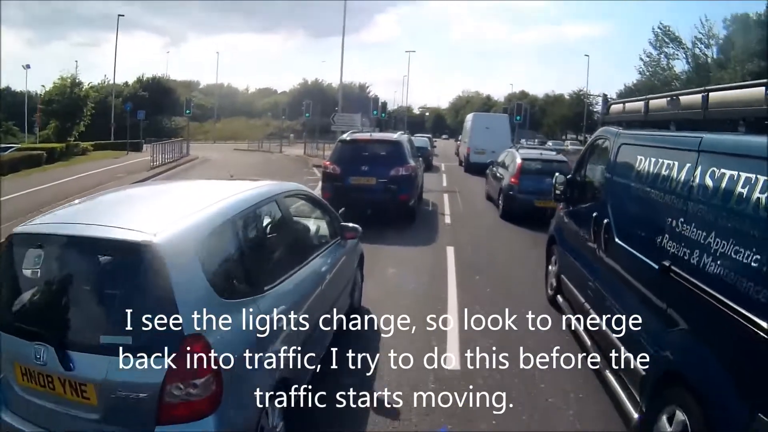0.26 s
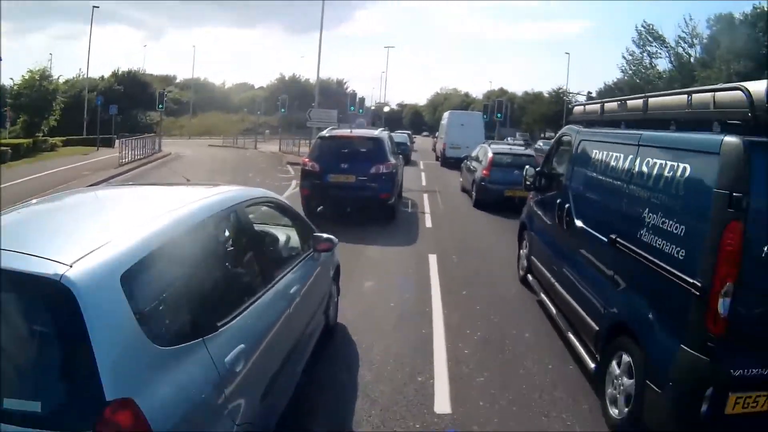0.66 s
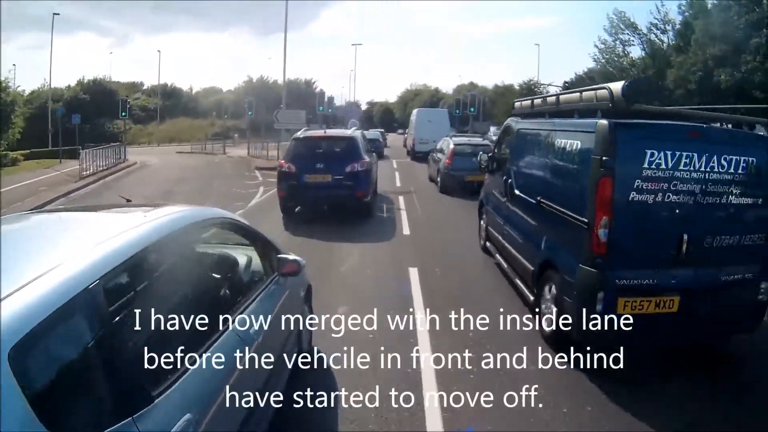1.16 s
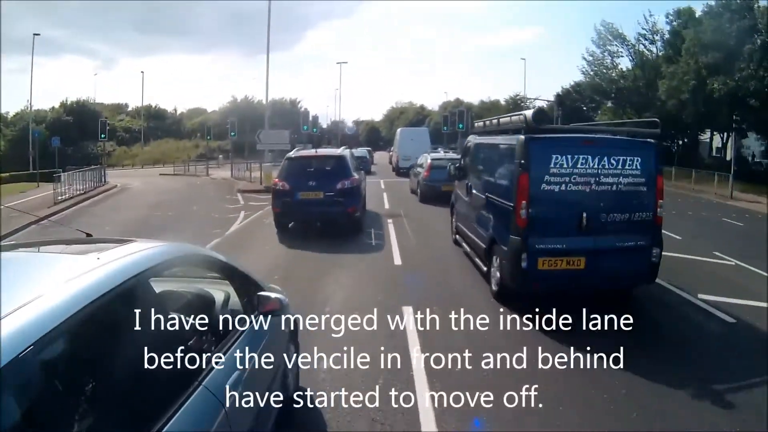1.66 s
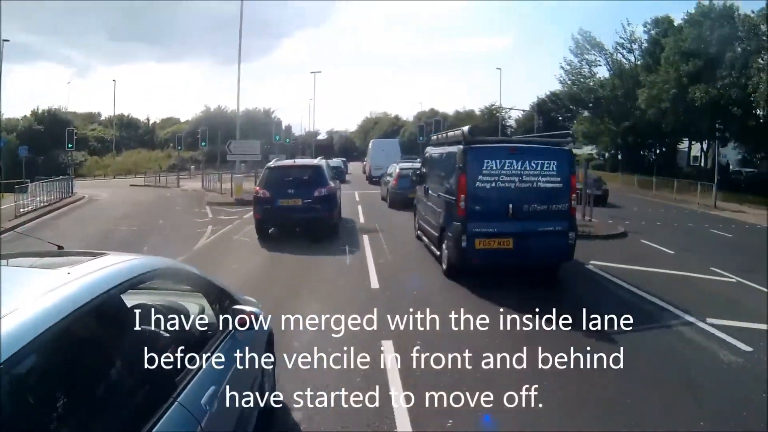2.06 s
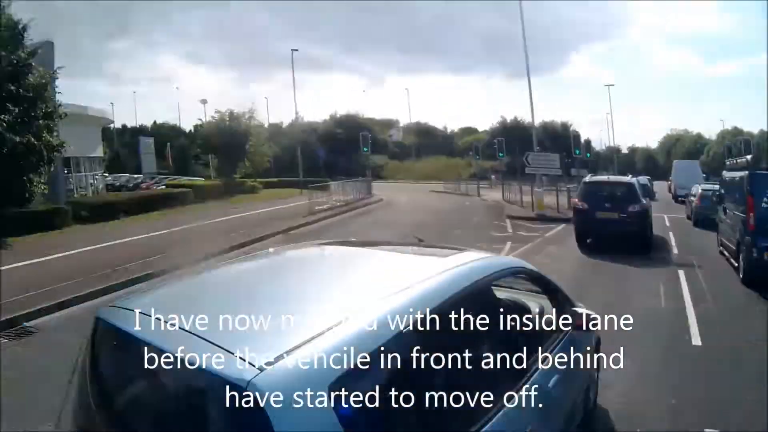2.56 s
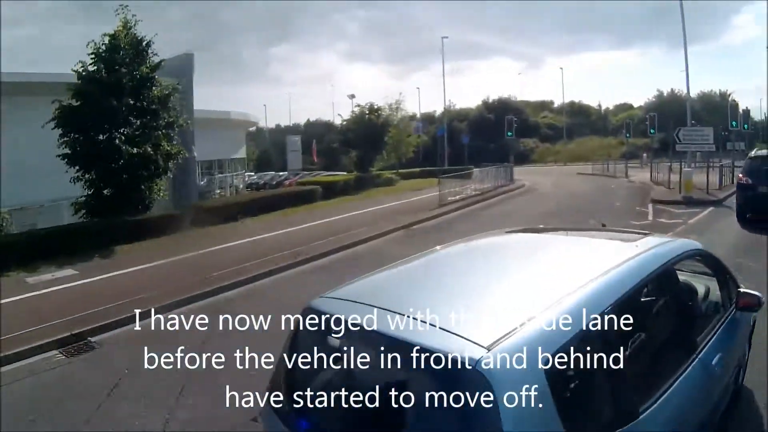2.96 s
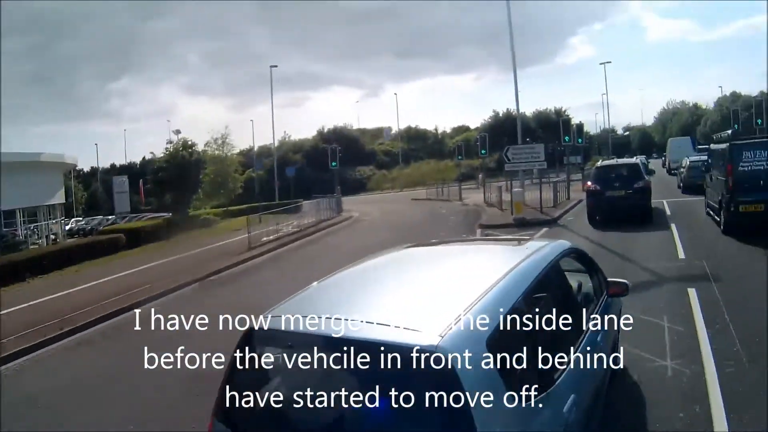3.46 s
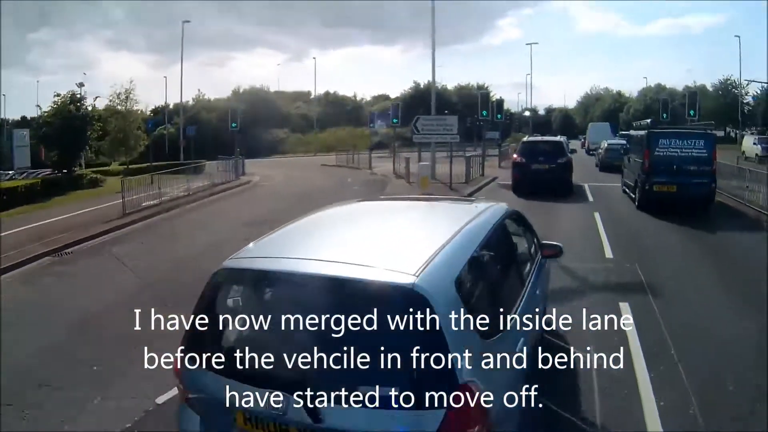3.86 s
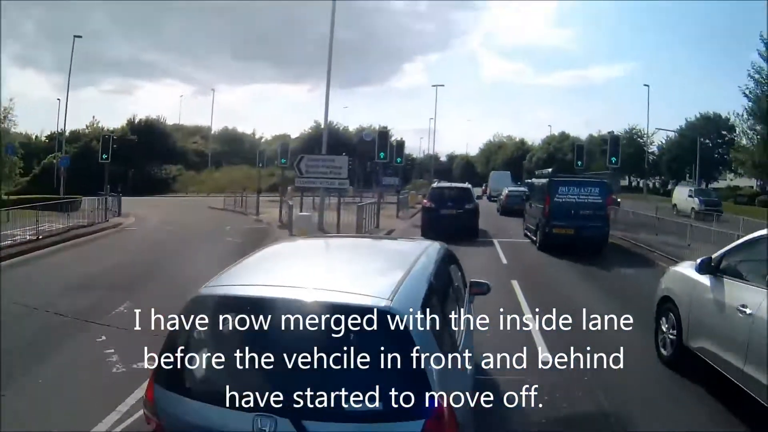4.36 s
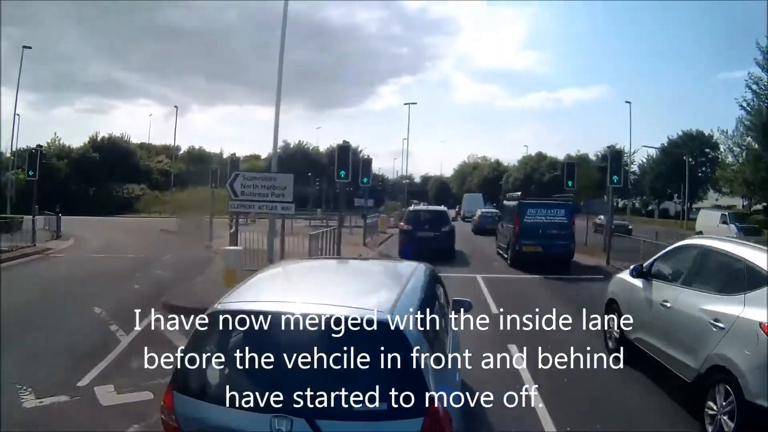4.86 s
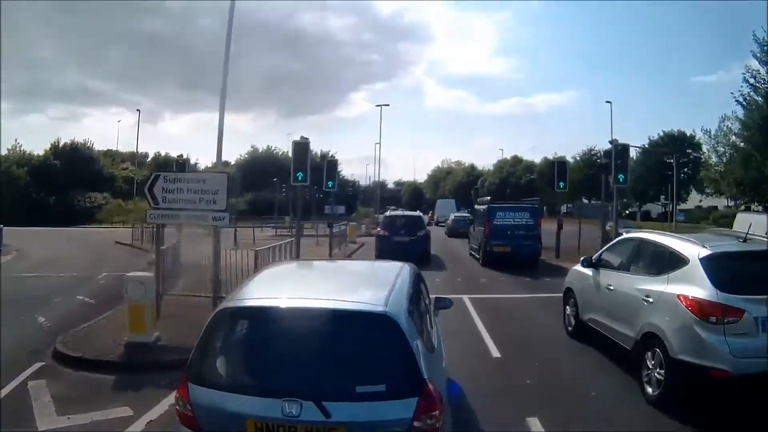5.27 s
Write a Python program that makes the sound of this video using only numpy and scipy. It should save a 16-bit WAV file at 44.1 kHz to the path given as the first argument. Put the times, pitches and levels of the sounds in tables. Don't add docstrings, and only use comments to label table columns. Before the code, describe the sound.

A two-tone car horn gives one steady blast late on, over low traffic rumble, pulling-away engines and wind buffeting a rider's microphone.

```python
import sys
import numpy as np
from scipy import signal
from scipy.io import wavfile
from scipy.ndimage import uniform_filter1d

SR = 44100
rng = np.random.default_rng(int(sys.argv[2]) if len(sys.argv) > 2 else 0)


def log_audio(samples):
    frames = np.atleast_2d(samples).T
    limited = np.clip(frames, -1, 1)
    pcm = np.round(limited * 32767).astype(np.int16)
    wavfile.write(sys.argv[1], SR, pcm)


def invert_db(x):
    u = np.asarray(x, float) / 20
    return 10 ** u


N = 243431

# (frequency [Hz], level [dB per Hz])
ROAD_COLOUR = [(8.8, -42), (15, -23), (48, -2.5), (71, -9), (123, -8.5), (336, -16), (489, -18.5),
               (808, -18), (1300, -25.5), (1550, -24.5), (2200, -31.5), (2690, -32), (6000, -55),
               (7800, -95), (13200, -120)]
# (rumble [dB/s], roar [dB/s], hiss [dB/s])
QUEUE_GROWTH = (0.61, 0.55, 0.3)
# (time [s], level [dB], length [s], centre [Hz])
TYRE_SURGES = [(0.122, 1.5, 0.33, 150), (1.555, 2, 0.62, 2080), (2.2, 1.5, 0.94, 1670),
               (2.15, 3, 0.22, 199), (2.74, 3, 0.47, 840), (2.903, 1.5, 0.19, 2500), (3.3, 2, 0.2, 200),
               (3.57, 4.5, .12, 700), (3.8, 3.5, 0.37, 1274), (3.98, 4, 0.26, 200), (4.199, 3, 0.12, 705),
               (4.598, 4, 0.1, 180), (4.84, 2, .1, 150), (5.292, 7.5, 0.053, 149.9), (5.379, 2, .12, 2002)]
SURGE_OCTAVES, SURGE_LEAD = 1, 0.69

# (time [s], firing rate [Hz], level [dB])
NEAR_ENGINE = [(0.7, 23.32, -34), (1.2, 26.28, -37), (1.4, 31.63, -31), (1.53, 37.33, -29),
               (1.81, 47.3, -32), (1.99, 49.05, -27.5), (2.36, 46.5, -29.5), (3.02, 45.43, -27.5),
               (3.5, 42.36, -31.5), (4.0, 40.46, -24.5), (4.09, 41.9, -23.5), (4.4, 43.63, -38),
               (4.78, 46.3, -23.5), (4.9, 48.2, -38), (5.06, 48.76, -27), (5.7, 54.7, -30.5)]
AHEAD_ENGINE = [(0.0, 40.4, -42), (0.54, 44.27, -30), (1.0, 45.7, -34.5), (1.3, 45.6, -28),
                (1.41, 48.55, -31), (1.77, 60.1, -24.5), (2.1, 68.7, -28.5), (2.18, 70.16, -22),
                (2.51, 79.7, -24.5), (2.8, 86.96, -23.5), (3.2, 88.46, -25.5), (3.45, 85.3, -28.5),
                (3.6, 82.46, -33), (3.68, 83.1, -21.5), (3.95, 75.6, -23.5), (4.2, 75.5, -34)]
FAR_ENGINE = [(0.6, 53.64, -35), (1.02, 61.26, -31.5), (1.35, 74.4, -32), (1.49, 78.9, -27),
              (1.8, 88.4, -35.5), (2.16, 92.4, -33), (2.32, 92.6, -39), (2.45, 86.2, -29), (2.7, 86, -32)]
BESIDE_ENGINE = [(2.6, 62.7, -31), (2.95, 69.06, -31), (3.054, 72.5, -24), (3.2, 75, -33),
                 (3.42, 74.5, -27)]
# (time [s], firing rate [Hz], level [dB])
IDLE_ENGINE = [(0, 98.6, -52), (.2, 97.2, -38), (.5, 101.2, -29), (.75, 100.7, -39), (.9, 100, -46)]
LATE_ENGINE = [(2.8, 123.3, -37), (3, 121.5, -38), (3.2, 118.6, -31.5), (3.4, 114.2, -35.5),
               (3.6, 111.5, -48)]
# (time [s], firing rate [Hz], level [dB], drone level [dB])
VAN_ENGINE = [(0.0, 66.3, -21, -43), (0.2, 64.95, -26.5, -38), (0.382, 70.03, -27, -41.5),
              (0.842, 88.1, -36.5, -34.5), (1.1, 93, -42, -44)]

# (time [s], level [dB], length [s])
WIND_GUSTS = [(1.18, -39, .12), (1.516, -29, .07), (2.72, -31, .07), (3.079, -34, 0.11), (3.499, -34, .07),
              (3.8, -34, .15), (4.085, -27, 0.065), (4.36, -30, .07), (4.81, -25.5, .07), (5.281, -30, .1),
              (5.52, -31, 0.099)]
CALM_DB = -49

# (time [s], level [dB], swing rate [Hz])
FRAME_BUMPS = [
    (4.06, -20, 55),
    (4.088, -17, 60),
    (5.294, -12, 130),
    (5.314, -13, 60),
]

# (time [s], level [dB])
LOW_SWING = [(4.31, -19), (4.59, -18.5), (4.66, -20.5), (4.79, -16), (4.85, -22), (4.95, -22.5),
             (5.02, -20.5), (5.17, -20.5), (5.22, -18.5)]
HIGH_SWING = [(4.31, -21), (4.38, -26.5), (4.46, -20.5), (4.59, -28), (4.72, -21), (4.8, -23.5),
              (4.87, -21.5), (5.15, -17.5), (5.22, -20)]
# (time [s], pitch [Hz])
LOW_PITCH = [(4.31, 368.5), (4.5, 367.5), (4.72, 368.45), (4.96, 366.8), (5.22, 367.25)]
# (multiple [-], level at the start [dB], level
# at the end [dB])
LOW_ECHOING = [(6, -37.5, -48), (7, -20, -24), (8, -19.5, -18.5), (9, -41.5, -44.5)]
HIGH_ECHOING = [(4, -42.5, -51), (5, -49.5, -47.5), (6, -34, -33), (7, -40, -31)]
# (multiple [-], level at the start [dB], level at the end
# [dB])
LOW_WAVERING = [(4, -50, -45), (5, -37, -57), (10, -57, -59), (11, -55, -48), (12, -58, -58), (13, -56, -56),
                (14, -51, -54), (15, -59, -59), (16, -59, -59)]
HIGH_WAVERING = [(2, -45, -37), (3, -51, -52), (8, -45, -42), (9, -54, -56)]
# (multiple of low [-], steps of the beat [-], level [dB])
BEAT_TONES = [(6, 1, -51), (7, -1, -40), (7, 1, -34), (7, 2, -45), (8, -1, -42), (8, 1, -38), (8, 2, -47),
              (11, 1, -59), (11, 5, -59), (9, 1, -54)]
# (frequency [Hz], level [dB], decay by 60 dB [s])
DISC_RINGS = [(2600, -46, .4), (2645, -38.5, .3), (3025, -38.5, .3), (3079, -46, .25), (2890, -46, .25),
              (3600, -52, .012), (4080, -52, .01)]
MIRROR_PATHS = [(0.138, 7.961, -0.256, -0.145), (1.109, 0.615, 0.032, -0.005), (0.43, 4.538, -0.719, 0.381),
                (0.429, 1.759, 0.447, -0.558), (0.248, 4.971, -1.116, 0.647),
                (0.202, 6.964, -0.019, -0.436)]
PRESS_S, STRIKE_S, RELEASE_S = 4.28, 4.2963, 5.236
LOW_HZ, HIGH_TO_LOW = 367.7, 1.1196
SOUND_M_PER_S = 343


def evened(x):
    return x / np.sqrt(np.mean(x ** 2) + 1e-20)


def curves(rows):
    s, *columns = np.transpose(rows)
    return [np.interp(np.arange(N) / SR, s, column) for column in columns]


def drift(hz):
    step = np.arange(N) * 2 * hz / SR
    points = int(step[-1]) + 2
    return np.interp(step, np.arange(points), rng.standard_normal(points))


def band(x, low_hz, high_hz):
    return signal.sosfilt(signal.butter(2, [low_hz, high_hz], "band", fs=SR, output="sos"), x)


def tone(db, turns):
    return np.sqrt(2) * invert_db(db) * np.sin(turns + 2 * np.pi * rng.random())


def traffic():
    frames, hz = N // 256 + 5, np.fft.rfftfreq(1024, 1 / SR)
    a, b, patches = rng.standard_normal((frames, 513, 3)).T
    patches = evened(uniform_filter1d(uniform_filter1d(patches, 8, 0), 24, 1))
    t = (np.arange(frames) - 2) * 256 / SR
    swell = np.outer(QUEUE_GROWTH, t - t.mean())
    surges = 0
    for s, db, length, centre_hz in TYRE_SURGES:
        in_pitch = np.exp(-(np.log2((hz + 1) / centre_hz) / SURGE_OCTAVES) ** 2)
        in_time = np.exp(-((t - s) / np.where(t < s, SURGE_LEAD * length, length)) ** 2)
        surges = surges + db * np.outer(in_pitch, in_time)
    place = np.interp(np.log(hz + 1), np.log([200, 800, 2000]), [0, 1, 2])
    share = np.clip(1 - abs(place[:, None] - np.arange(3)), 0, 1)
    road_hz, road_db = np.transpose(ROAD_COLOUR)
    colour = np.interp(np.log(hz + 1), np.log(road_hz + 1), road_db, right=-100)
    level_db = colour[:, None] + share @ swell + surges + 0.79 * patches
    roar = signal.istft((a + 1j * b) * invert_db(level_db), nperseg=1024, noverlap=768)[1][:N]
    return invert_db(-26.5) * evened(roar)


def engine(rows, orders, rough):
    hz, db = curves(rows)
    t = np.arange(N) / SR
    inside = np.minimum(t - rows[0][0] + 0.047, rows[-1][0] + 0.034 - t)
    heard = np.clip(inside / 0.16, 0, 1)
    turns = 2 * np.pi * np.cumsum(hz * (1 + .004 * drift(6))) / SR
    exhaust = sum(tone(order_db + 2.1 * drift(4) * (k != 1), k * turns) for k, order_db in orders)
    return invert_db(db) * heard * exhaust * (1 + rough * drift(14))


def engines():
    near = engine(NEAR_ENGINE, [(1, 0), (2, -20), (3, -8.5), (4, -20)], rough=.12)
    ahead = engine(AHEAD_ENGINE, [(1, 0), (2, -26)], rough=.1)
    _, firing_db, drone_db = curves(VAN_ENGINE)
    van = engine([row[:3] for row in VAN_ENGINE], [(1, 0), (2, drone_db - firing_db)], rough=0.29)
    far = engine(FAR_ENGINE, [(1, 0), (2, -18)], rough=.12)
    faint = sum(engine(rows, [(0.98, 0)], rough=0.068) for rows in (BESIDE_ENGINE, IDLE_ENGINE, LATE_ENGINE))
    return near + ahead + van + far + faint


def wind():
    t = np.arange(N) / SR
    gusts = sum(invert_db(db) * np.exp(-((t - s) / length) ** 2) for s, db, length in WIND_GUSTS)
    pressure = evened(band(band(rng.standard_normal(N), 18.5, 55), 11.5, 60))
    return (invert_db(CALM_DB) + gusts) * invert_db(-3.0) * pressure


def bumps():
    t, out = np.arange(N) / SR, np.zeros(N)
    for s, db, hz in FRAME_BUMPS:
        out += invert_db(db) * np.exp(-((t - s) * hz / 0.27) ** 2) * np.sin(2 * np.pi * hz * (t - s))
    return out


def crack():
    after = np.arange(N) / SR - STRIKE_S
    burst = evened(band(rng.standard_normal(N), 1200, 5500))
    return invert_db(-36) * (after > 0) * np.exp(-abs(after) / 0.0072) * burst


def discs(striking):
    t = np.arange(SR // 2) / SR
    rings = sum(invert_db(db - 60 * t / t60) * np.sin(2 * np.pi * hz * t) / np.sqrt(t60 * SR / 30)
                for hz, db, t60 in DISC_RINGS)
    last_blows = 1 + 1.8 * np.exp(-((np.arange(N) / SR - RELEASE_S) / .015) ** 2)
    return signal.fftconvolve(striking * last_blows * rng.standard_normal(N), rings)[:N]


def mirrored(hz):
    done = np.linspace(0, 1, 200)
    paths = 1
    for strength, detour, growth, bend in MIRROR_PATHS:
        extra_m = detour + growth * done + bend * done ** 2
        paths = paths + strength * np.exp(2j * np.pi * hz * extra_m / SOUND_M_PER_S)
    level_db = 10 * np.log10(abs(paths) ** 2 + .06)
    return np.interp(np.arange(N) / SR, STRIKE_S + done * (RELEASE_S - STRIKE_S), level_db)


def horn(rows, tuning, echoing, wavering, sag, ring_s, knock, lead=0, lag_s=0):
    t = np.arange(N) / SR
    swing_db, = curves(rows)
    after = np.maximum(t - RELEASE_S, 0)
    free = np.clip((STRIKE_S - t) / 0.0203, 0, 1) + 1 - np.exp(-after / 0.026)
    hz = curves(LOW_PITCH)[0] * tuning * (1 - sag * free + .0014 * drift(30))
    turns = 2 * np.pi * np.cumsum(hz) / SR
    turns = lead + turns - turns[round(STRIKE_S * SR)]
    rise = np.clip((t - PRESS_S - lag_s) / .009, 0, 1) ** 2 * (1 + .9 * (t < STRIKE_S))
    swing = np.sqrt(2) * invert_db(swing_db - 60 * after / ring_s) * rise * np.sin(turns)
    buzz = 0
    for k, *db in echoing:
        level_db = np.interp(t, [STRIKE_S, RELEASE_S], db) + mirrored(k * tuning * LOW_HZ)
        buzz = buzz + tone(level_db, k * turns)
    for k, *db in wavering:
        level_db = np.interp(t, [STRIKE_S, RELEASE_S], db) + 3.2 * drift(5)
        buzz = buzz + tone(level_db, k * turns)
    overshoot = 1 + knock * np.exp(-np.maximum(t - STRIKE_S, 0) / 0.014)
    bite = np.clip((t - STRIKE_S) / .004, 0, 1)
    striking = bite * overshoot * invert_db(-60 * after / .025)
    return turns, swing, buzz, striking


def horns():
    low, low_swing, low_buzz, striking = horn(
        LOW_SWING, 1, LOW_ECHOING, LOW_WAVERING, sag=.06, ring_s=.33, knock=.3)
    high, high_swing, high_buzz, _ = horn(
        HIGH_SWING, HIGH_TO_LOW, HIGH_ECHOING, HIGH_WAVERING,
        sag=.015, ring_s=0.16, knock=0.27, lead=-2.3, lag_s=.012)
    beat = high - low
    mixed = sum(tone(db + 5.0 * drift(7), k * low + steps * beat) for k, steps, db in BEAT_TONES)
    buzz = (low_buzz * (1 + 0.17 * drift(35)) + high_buzz + mixed) * striking
    direct = low_swing + high_swing + buzz + discs(striking) + crack()
    t = np.arange(SR // 2) / SR
    echoes = rng.standard_normal(len(t)) * invert_db(-60 * t / .6) * (t > .02)
    echoes = echoes / np.linalg.norm(echoes)
    return direct + invert_db(-21) * signal.fftconvolve(direct, echoes)[:N]


def scene():
    return np.tile(traffic() + engines() + wind() + bumps() + horns(), (2, 1))


def patchy_noise(share):
    frames = N // 1024 + 3
    blocks = rng.random((frames, 33)) < share
    blocks = np.repeat(blocks, 32, axis=1)[:, :1025]
    blocks = np.repeat(blocks, 2, axis=0)[:frames]
    a, b = rng.standard_normal((frames, 1025, 2)).T
    return evened(signal.istft((a + 1j * b) * blocks.T, nperseg=2048, noverlap=1024)[1][:N])


def low_pass(x):
    return signal.sosfilt(signal.butter(12, 16180, fs=SR, output="sos"), x)


def record(dry):
    slow = signal.resample_poly(dry[0], 40, 147)
    held = signal.resample_poly(np.repeat(slow, 4), 147, 160)[:N]
    held = np.pad(held, (0, N - len(held)))
    slope = np.sqrt(abs(uniform_filter1d(np.diff(held, prepend=0) ** 2, 700)))
    grit = invert_db(-16) * np.maximum(slope - .006, 0) * band(rng.standard_normal(N), 1500, 10500)
    hiss = invert_db(-63.5) * band(rng.standard_normal(N), 4000, 10300)
    hiss = hiss + invert_db(-68) * band(patchy_noise(.3), 11000, 15500)
    loud = invert_db(-25.0) * np.maximum(slope - .012, 0) * patchy_noise(.45)
    floor = invert_db(-56.5) * band(rng.standard_normal(N), 5000, 6800)
    both = held + grit + floor + np.outer([1, -1], hiss + loud)
    edge = signal.firwin(401, 15850, fs=SR)[None]
    mix = signal.oaconvolve(both, edge, "same")
    return low_pass(mix)


dry = scene()
out = record(dry)
log_audio(out)
```